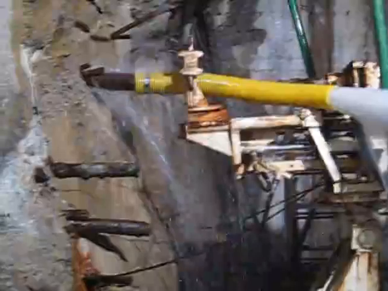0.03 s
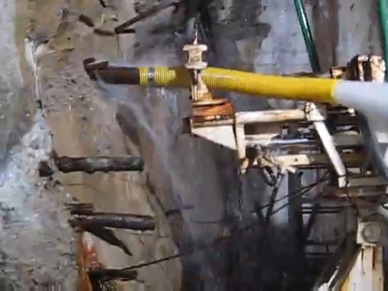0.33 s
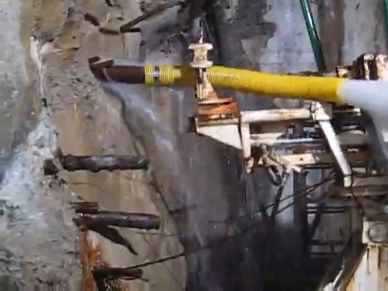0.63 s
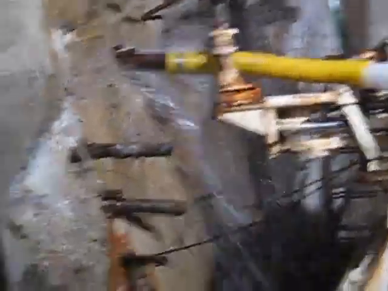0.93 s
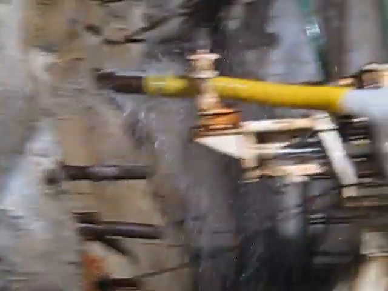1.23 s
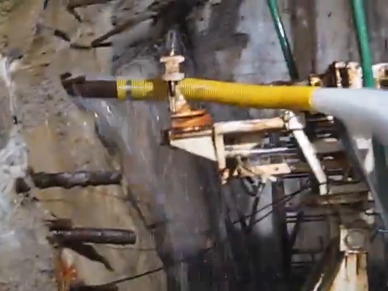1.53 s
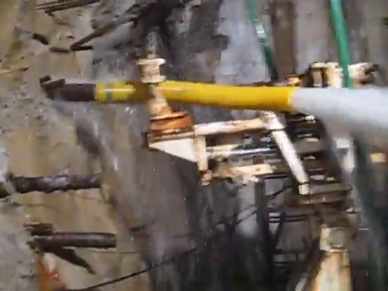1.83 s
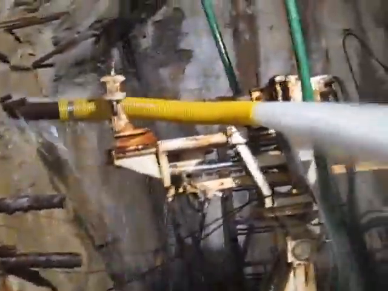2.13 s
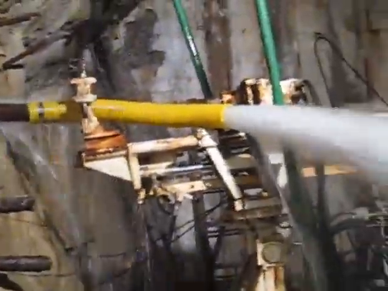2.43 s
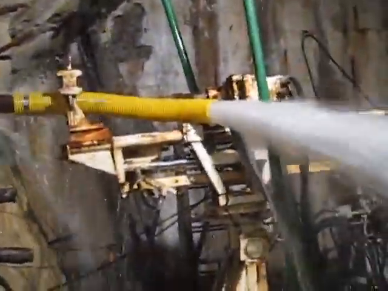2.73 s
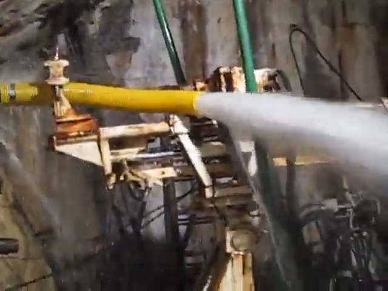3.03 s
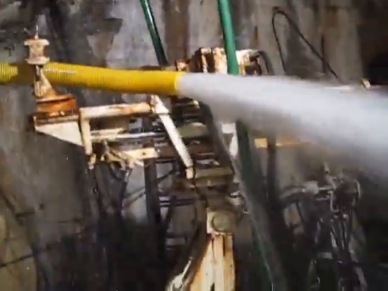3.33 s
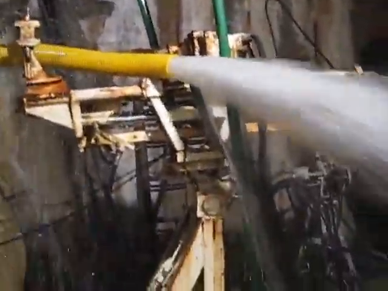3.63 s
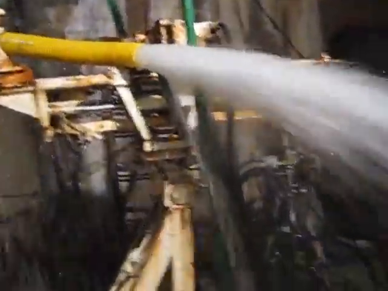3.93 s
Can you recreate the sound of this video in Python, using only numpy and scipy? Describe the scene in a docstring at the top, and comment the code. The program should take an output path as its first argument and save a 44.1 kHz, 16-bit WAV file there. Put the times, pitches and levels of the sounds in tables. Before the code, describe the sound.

A powerful water jet hisses and roars steadily from a hose in a rock tunnel.

```python
"""Hose jet in a rock tunnel

A thick jet of water tears into hissing spray that surges and flutters. Drops spatter,
and the falling water roars in the tunnel's resonances. The sound opens abruptly
and a gain control clamps down at once."""
import sys
import numpy as np
from scipy import signal
from scipy.fft import rfft, irfft
from scipy.io import wavfile

SR = 44100
rng = np.random.default_rng(int(sys.argv[2]) if len(sys.argv) > 2 else 0)


def persist_wave(psi):
    """Save psi, clipped to +-1, as 16-bit WAV."""
    counts = np.round(np.clip(psi, -1, 1) * 32767).astype(np.int16)
    wavfile.write(sys.argv[1], SR, np.atleast_2d(counts).T)


N = 176400
T = np.arange(N) / SR
HZ = np.fft.rfftfreq(N, 1 / SR)


def amp(db):
    """Decibels to gain."""
    return 10 ** (np.asarray(db) / 20)


def unit(x):
    """Scale to unit rms."""
    return x / np.sqrt(np.mean(x ** 2) + 1e-20)


def level(points):
    """Gain over time from rows of time_s, level_db."""
    return amp(np.interp(T, *np.transpose(points)))


def colour(x, points):
    """Filter by rows of freq_hz, gain_db; unit rms."""
    hz, db = np.transpose(points)
    gain = amp(np.interp(np.log(HZ + 1), np.log(hz), db))
    return unit(irfft(rfft(x) * gain, N))


def wander(low_hz, high_hz):
    """Random movement, equal power per octave; unit rms."""
    band = (HZ >= low_hz) & (HZ <= high_hz)
    return unit(irfft(rfft(rng.standard_normal(N)) * band / np.sqrt(HZ + 1), N))


def turbulence(depth_db, patch_hz, patch_s):
    """Noise whose level varies in short-lived patches of time and frequency."""
    hz, t, spectrum = signal.stft(rng.standard_normal(N), SR, nperseg=256)
    freq_pole, time_pole = np.exp(-hz[1] / patch_hz), np.exp(-t[1] / patch_s)
    patches = signal.lfilter([1], [1, -freq_pole], rng.standard_normal(spectrum.shape), axis=0)
    patches = unit(signal.lfilter([1], [1, -time_pole], patches, axis=1))
    return signal.istft(spectrum * amp(depth_db * patches), SR, nperseg=256)[1][:N]


def tunnel(x, t60_s=0.97, tail_db=-6.5):
    """Add a dense tail of reflections from the rock walls."""
    tail = rng.standard_normal(SR) * np.exp(-np.log(1000) * T[:SR] / t60_s)
    return x + amp(tail_db) * signal.fftconvolve(x, tail / np.linalg.norm(tail))[:N]


def ringing(modes):
    """Tunnel resonances kept ringing by the churning water."""
    out = np.zeros(N)
    for pitch_hz, half_width_hz, level_db in modes:
        peak = 1 / (1 + ((HZ - pitch_hz) / half_width_hz) ** 2)
        out += amp(level_db) * unit(irfft(rfft(rng.standard_normal(N)) * peak, N))
    return unit(out)


def roar(surge, churn_db=0.12, faint_db=-41.5, surge_db=0.53):
    """Falling water lands and churns; a low boom and a hollow ring swell and fade in the tunnel."""
    # Envelopes: time_s, level_db
    churn_level = [(0.1, -25.8), (0.46, -26), (0.52, -26.9), (0.93, -26.6), (1.11, -25), (1.77, -27.1),
                   (2.06, -26.5), (2.84, -27.4), (3.08, -26), (3.97, -27.5)]
    boom_level = [(0.1, -45), (0.4, -54), (0.65, -39), (1.15, -34.5), (1.35, -45), (2.9, -44),
                  (3.17, -37.5), (3.43, -42), (3.72, -37), (3.97, -42.5)]
    hollow_level = [(0.1, -38), (0.65, -44), (1.45, -44), (1.72, -49), (2.1, -39.5), (2.5, -35.5),
                    (3.15, -46), (3.97, -50)]
    # Churn spectrum: freq_hz, gain_db
    churn_spectrum = [(15, -45), (28, -21), (45, -11.5), (68, -10.5), (86, -14), (120, -6.5), (150, -1.5),
                      (200, -1), (240, -0.5), (295, -4), (360, -1.5), (600, -3), (900, -4.5), (1400, -6.5),
                      (2000, -7), (4000, -15), (10000, -29)]
    # Tunnel resonances: pitch_hz, half_width_hz, level_db
    boom_modes = [(183, 19, -1.5), (228, 14, -6)]
    hollow_modes = [(526, 5.6, -0.5), (564, 17, -1.5)]
    faint_modes = [(397, 11, 0), (740, 35, 0.12), (870, 22, 0), (1780, 60, 1)]
    noise = turbulence(depth_db=0.65, patch_hz=500, patch_s=0.018)
    churn = amp(churn_db) * level(churn_level) * colour(noise, churn_spectrum)
    boom = level(boom_level) * ringing(boom_modes)
    hollow = level(hollow_level) * ringing(hollow_modes)
    faint = amp(faint_db) * ringing(faint_modes)
    return (churn + boom + hollow + faint) * amp(surge_db * surge)


def spatter(flow, level_db=-31.5, drops_per_s=2500, spread_db=4, decay_cycles=1.63):
    """Thousands of drops strike rock and steel, each a tick of a cycle or two."""
    pitches_hz = np.geomspace(598, 12000, 24)
    hit_chance = drops_per_s / len(pitches_hz) / SR
    out = np.zeros(N)
    for pitch_hz in pitches_hz:
        cycles = T[:SR // 50] * pitch_hz
        tick = np.sin(2 * np.pi * cycles) * np.exp(-cycles / decay_cycles)
        sizes = amp(spread_db * np.minimum(rng.exponential(1, N), 5))
        hits = sizes * rng.choice([-1, 1], N) * (rng.random(N) < hit_chance)
        out += signal.oaconvolve(hits, tick * pitch_hz ** 0.67)[:N]  # high ticks peak higher
    return amp(level_db) * flow * unit(tunnel(out))


def jet(flow, gain_db=0.47):
    """Spray tears off the jet: a bright hiss that follows the flow."""
    # Hiss envelope: time_s, level_db
    hiss_level = [(0.1, -20), (0.28, -20), (0.46, -19), (0.54, -20), (1.0, -19.5), (1.47, -19.5),
                  (1.9, -20.0), (2.07, -18.9), (2.55, -20.0), (2.77, -18.5), (2.85, -20.5), (3.01, -18),
                  (3.14, -20), (3.27, -18.5), (3.45, -19.6), (3.68, -20.0), (3.87, -19.6), (3.98, -21.5)]
    # Hiss spectrum: freq_hz, gain_db
    hiss_spectrum = [(300, -31), (900, -10), (1600, -6), (2100, -4), (2500, -0.94), (4000, 0), (6000, -2),
                     (8300, -4), (10000, -4.4), (12300, -6), (14000, -11.3), (16300, -20), (17200, -30)]
    noise = turbulence(depth_db=0.68, patch_hz=1200, patch_s=0.033)
    return amp(gain_db) * flow * level(hiss_level) * colour(noise, hiss_spectrum)


def scene():
    """One uneven flow drives the hiss, the spatter and the roar."""
    surge_db, flutter_db = 0.24, 0.22
    surge = wander(low_hz=4, high_hz=16)
    flutter = wander(low_hz=12, high_hz=160)  # the jet breaking into slugs
    flow = amp(surge_db * surge + flutter_db * flutter)
    return (jet(flow) + spatter(flow) + roar(surge))[None]


def record(dry):
    """The input opens, the gain control clamps down and holds, then a steep low-pass."""
    open_s, input_db, cutoff_hz = 0.036, 5.5, 17150
    threshold_db, settle_s, ratio = -23.0, 0.027, 2.0
    x = dry[0] * (T >= open_s) * amp(input_db)
    pole = np.exp(-1 / (settle_s * SR))
    power_db = 10 * np.log10(signal.lfilter([1 - pole], [1, -pole], x ** 2) + 1e-12)
    over_db = np.maximum(np.maximum.accumulate(power_db) - threshold_db, 0)
    x = x * amp(-over_db * (1 - 1 / ratio))
    lowpass = signal.firwin(511, cutoff_hz, window=("kaiser", 8), fs=SR)
    return signal.fftconvolve(x, lowpass, "same")[None]


dry = scene()
out = record(dry)
persist_wave(out)
```